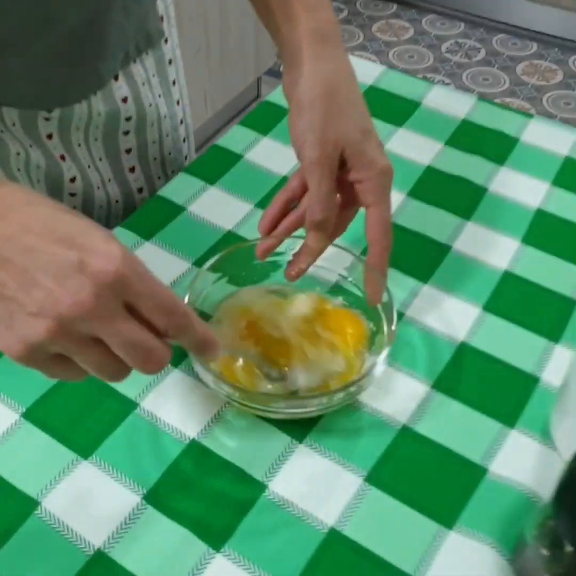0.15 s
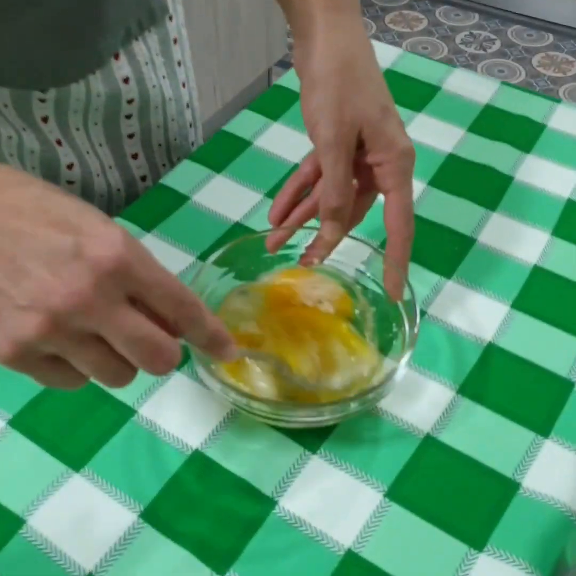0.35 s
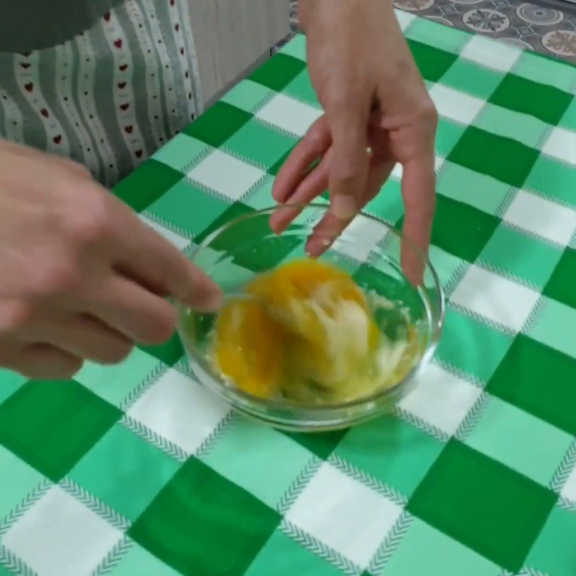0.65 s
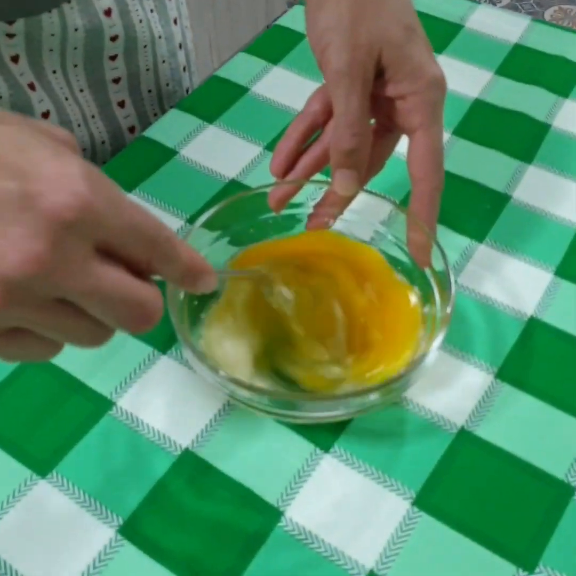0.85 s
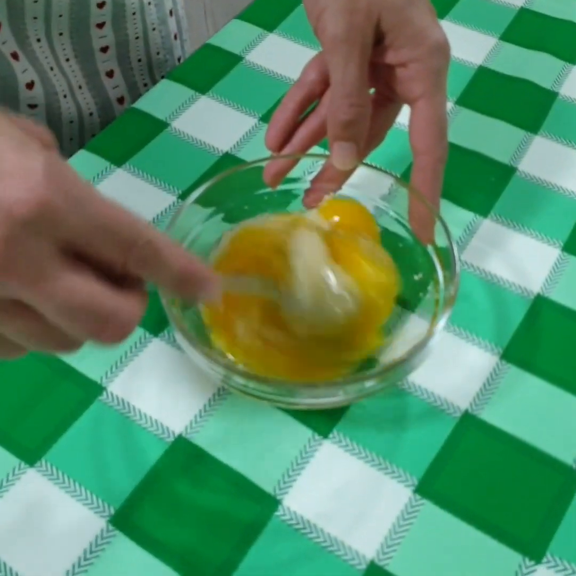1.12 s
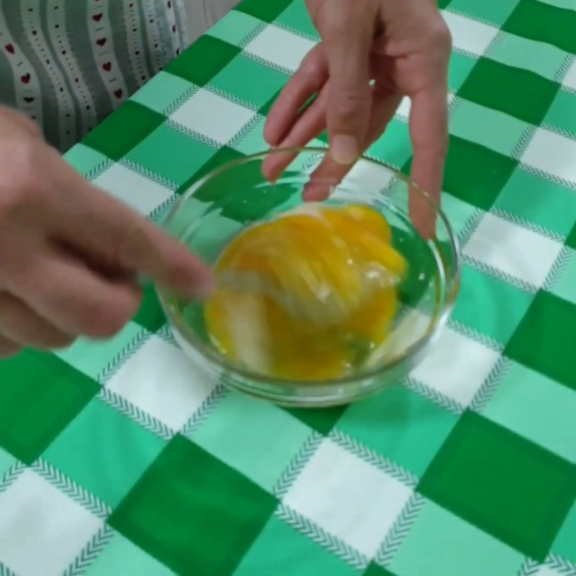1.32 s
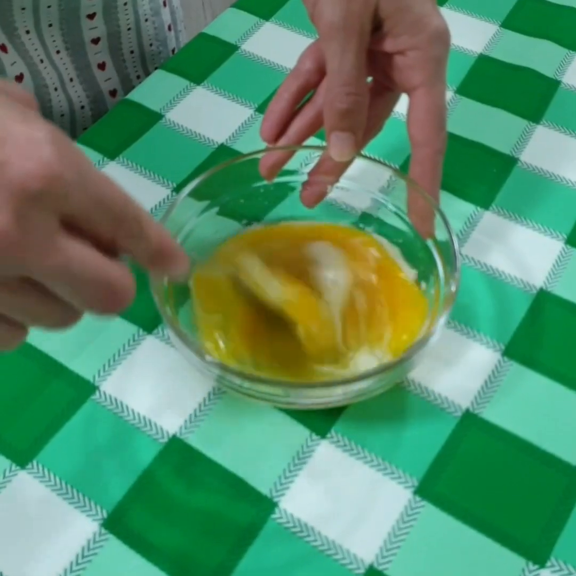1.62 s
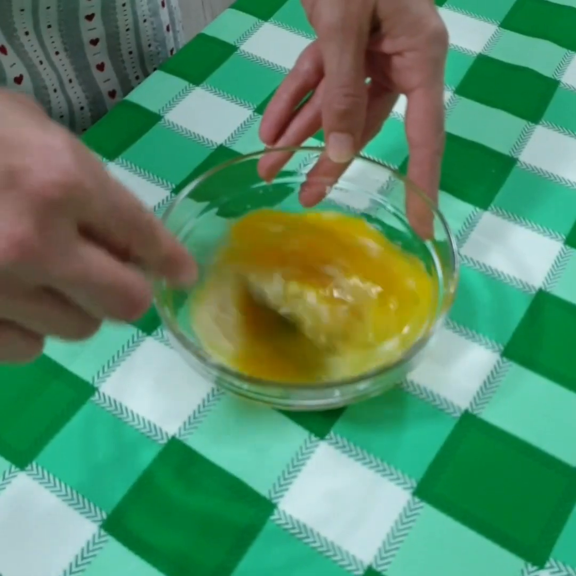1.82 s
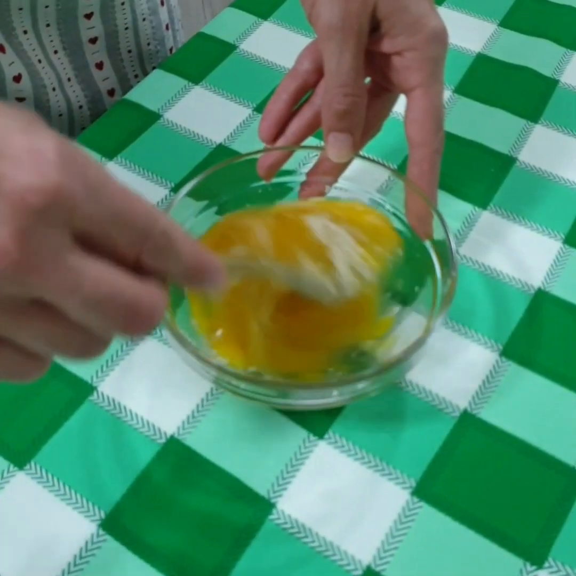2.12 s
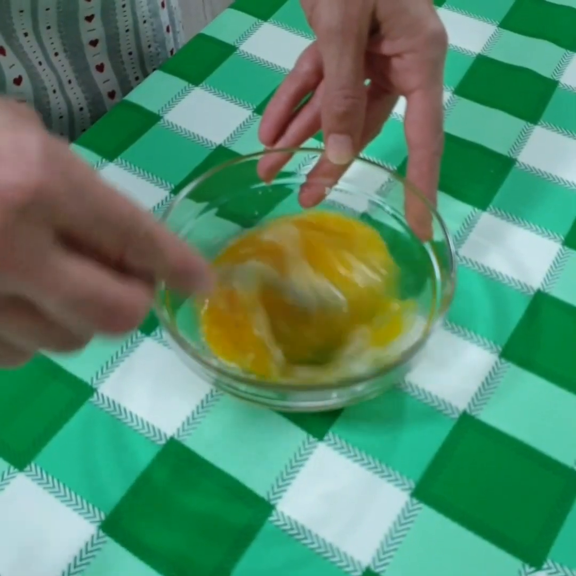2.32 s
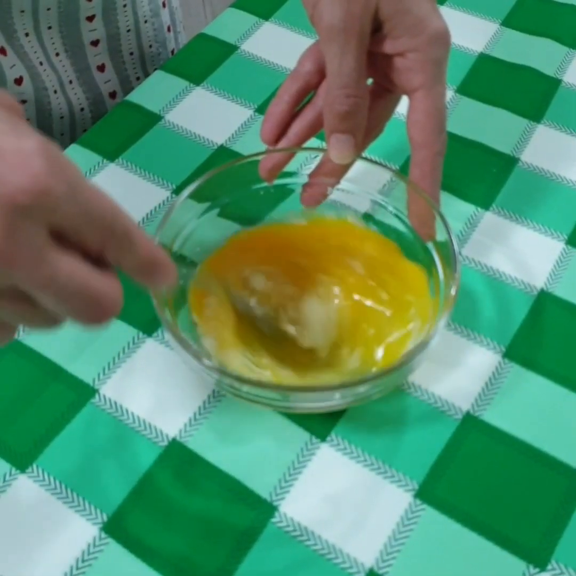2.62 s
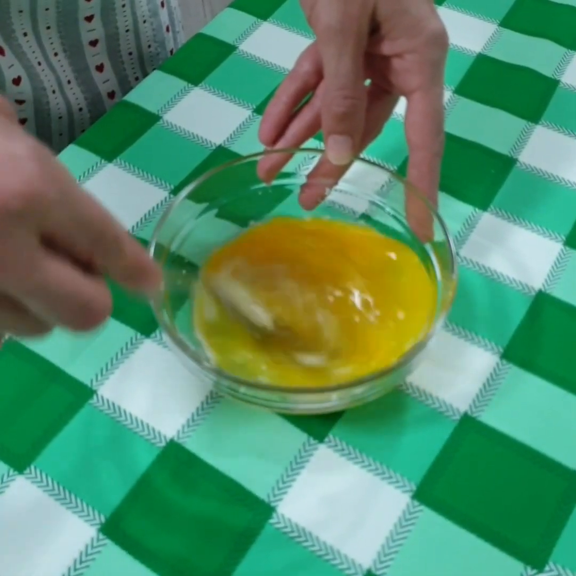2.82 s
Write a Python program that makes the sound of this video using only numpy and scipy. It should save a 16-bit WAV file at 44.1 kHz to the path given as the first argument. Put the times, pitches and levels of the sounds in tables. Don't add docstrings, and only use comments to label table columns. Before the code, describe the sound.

A fork beats eggs in a small glass bowl, about five strokes a second, with damped glassy ticks, wet swishes and soft table thumps; one loud rim clang comes early. Close stereo phone microphone, hard live kitchen.

```python
import sys
import numpy as np
from scipy import signal
from scipy.fft import rfft, irfft
from scipy.io import wavfile
from scipy.ndimage import uniform_filter1d

SR = 44100
rng = np.random.default_rng(int(sys.argv[2]) if len(sys.argv) > 2 else 0)


def amp(db):
    return 10 ** (np.asarray(db, float) / 20)


def write(x):
    x = np.atleast_2d(x).T
    wavfile.write(sys.argv[1], SR, np.round(np.clip(x, -1, 1) * 32767).astype(np.int16))


N = 130095

# [t/s, peak level/dB, strongest tone f/Hz, tone share/dB]
BOTTOM_TAPS = [(0.0324, -23.5, 2070, -10.5), (0.0573, -26.5, 2000, -10), (0.2263, -23, 10560, -4.5),
               (0.2563, -22, 2630, -4.5), (0.4223, -18, 13800, -13), (0.446, -24.5, 2034, -4),
               (0.626, -20.5, 2060, -11), (0.651, -28, 2020, -1.5), (0.818, -24, 7760, 1),
               (0.8334, -30, 2000, -15), (1.0171, -25.5, 7900, -4), (1.042, -31.5, 14800, 4),
               (1.4131, -19.5, 8700, -20), (1.444, -30.5, 14600, -5), (1.617, -22, 8600, -13),
               (1.6523, -26.5, 3080, -6.5), (2.0253, -26, 2710, 0), (2.0453, -38.5, 2490, 3),
               (2.226, -21.5, 4150, -6), (2.4296, -24.5, 2130, -12), (2.4563, -28.5, 7050, -1),
               (2.6411, -24.5, 14800, -3), (2.6628, -27.5, 2100, -7), (2.8639, -32, 2090, 3.5),
               (2.898, -44.5, 2360, 6)]
# [t/s, peak level/dB, strongest tone f/Hz, tone share/dB]
WALL_TAPS = [
    (0.1952, -35.5, 2200, 0.5),
    (0.399, -38.5, 13600, -18),
    (0.5953, -21.5, 2170, -8.5),
    (0.7879, -27.5, 7140, -3),
    (1.3847, -24, 3170, -9),
    (1.5842, -18, 6330, -7),
    (1.9918, -25.5, 6460, -4),
    (2.3854, -24.5, 7660, -2.5),
    (2.6044, -30, 2070, -10.5),
    (2.804, -20.5, 3100, -2.5),
]
# [t/s, peak level/dB, strongest tone f/Hz, tone share/dB]
WALL_KNOCKS = [(0.73, -34.5, 7600, -14), (1.2025, -26.5, 6500, -4), (1.7982, -10.5, 3180, -2),
               (1.8075, -24, 4000, -3), (1.8205, -26.5, 3580, -1), (2.8035, -33, 1414, 5.5),
               (2.2045, -36.5, 2430, -6), (2.7, -37, 3300, 2), (2.344, -45, 1600, 6),
               (2.4575, -40, 2560, 8.5), (1.7905, -38, 2900, 5), (1.4055, -36, 2400, 6),
               (1.0435, -36, 1750, 5), (1.6535, -37, 1900, 4)]
# [t/s, peak level/dB, f/Hz]
THUMPS = [(0.032, -32.5, 230), (0.058, -29, 228), (0.228, -26, 240), (0.256, -30, 271), (0.422, -24.5, 265),
          (0.447, -27.5, 217), (0.625, -26, 274), (0.651, -27, 246), (0.819, -30, 245), (0.834, -31.5, 201),
          (1.018, -27.5, 244), (1.042, -28.5, 218), (1.211, -25.5, 277), (1.242, -26, 196),
          (1.414, -24.5, 262), (1.445, -30.5, 219), (1.617, -25, 235), (1.65, -26, 210), (1.797, -41, 254),
          (1.822, -23, 234), (1.854, -33, 217), (2.026, -27, 250), (2.227, -24, 259), (2.431, -27, 228),
          (2.458, -31.5, 250), (2.645, -30.5, 217), (2.663, -28.5, 251), (2.802, -34.5, 198),
          (2.862, -30, 254.6)]
# [t/s, peak level/dB, f/Hz]
POPS = [(0.424, -49, 546), (0.595, -30.5, 1210), (0.798, -40.5, 800), (0.984, -40.5, 967),
        (1.018, -37.5, 665), (1.446, -41, 1517), (1.681, -35.5, 623), (1.798, -34, 787),
        (2.198, -50.5, 1490), (2.345, -41.5, 970), (2.385, -40.5, 986), (2.576, -43.5, 1290),
        (2.608, -44.5, 880), (2.804, -38.5, 950), (0.7875, -42, 1200), (0.978, -47, 1250),
        (1.403, -40, 900), (1.411, -42, 800), (1.615, -42, 900), (2.612, -44, 1400)]
# [t/s, peak level/dB]
CLANGS = [
    (1.2105, -23),
    (1.2158, -2),
    (1.2195, -19),
]

RIM_HZ = [830, 945, 1165, 1400, 2448, 4300, 4364, 6390, 6480, 6590, 8800, 8907, 11570, 14495]
# [level/dB, t60/s]
RIM_DECAY = [(-22, .04), (-19, 0.039), (-18, 0.044), (-20, .03), (-19, 0.072), (-3, .02), (-7, .05),
             (-5, .02), (-5, 0.044), (-6, 0.042), (-4, .02), (-2, 0.055), (-10, .04), (-15, .09)]
# [f/Hz, level/dB, t60/s]
MORE_RIM_MODES = [(1763, -24, 0.073), (1960, -21.5, 0.087), (2044, -24, .08), (3167, -15, 0.045),
                  (4810, -9.5, 0.06), (5340, -15, .04), (6000, -18, .07), (6290, -16, 0.08), (7500, -25, .06),
                  (10100, -15, .03), (12170, -13, .05), (13300, -16, 0.035), (15100, -15, .06),
                  (15400, -18, .05)]
# [f/Hz, level/dB, t60/s]
BOWL_MODES = [(2070, -2.5, 0.033), (2620, -3, 0.029), (3148, -3, 0.025), (4150, -0.5, 0.02),
              (7360, 6.5, 0.027), (7840, 4.5, 0.022), (8380, -3, .02)]
# [f/Hz, level/dB, t60/s]
TABLE_MODES = [(61.2, -15.5, 0.5), (99, -6, 0.4), (136.14, -1, 0.46), (184.9, -2, 0.37),
               (223.5, -0.5, 0.29), (250, -3.5, 0.43), (285, -1.5, 0.44), (339, -11, 0.21),
               (368, -16.5, .25), (415, -21, 0.23), (466, -21, 0.24), (500.6, -22, 0.21), (593, -24, .15)]

# [f/Hz, level/dB]
SCRAPE_COLOUR = [(300, -24), (800, -21), (1300, -10), (2100, 0.5), (4000, -5), (7800, 5.5), (11000, -3),
                 (16000, 1)]
# [f/Hz, level/dB]
WALL_COLOUR = [(300, -42), (900, -12.5), (2000, -6), (3200, -1), (4500, 0.5), (6500, 1.5), (10000, -2),
               (16000, -4)]
# [f/Hz, level/dB]
KNOCK_COLOUR = [(300, -28), (900, -18), (2200, -15), (3200, 0), (4500, -0.5), (7000, 4.5), (10000, -1.5),
                (16000, -9)]
# [f/Hz, level/dB]
BOTTOM_WASH = [(350, -8), (500, -9), (946, -2.5), (1200, -12), (1600, -1), (2300, -3), (5160, -11.5),
               (7600, -6.5)]
# [f/Hz, level/dB]
WALL_WASH = [(300, -22), (500, -8.5), (774, -2.5), (1100, -9), (1970, -4.5), (3350, 0), (9090, -6),
             (16000, -10)]
# [f/Hz, level/dB]
RATTLE_COLOUR = [(400, -14), (1200, -6), (2000, -3), (3000, -6), (5000, 0), (7500, -4), (11000, -4),
                 (15000, -2)]
# [f/Hz, level/dB per Hz]
HUM_COLOUR = [(15, -52), (25, -33), (60, -8), (256, -4.5), (400, -23.5), (1000, -36.5), (2100, -34.5),
              (16000, -29.5)]
# [f/Hz, t60/s]
ROOM_T60 = [(250, 0.5), (1000, 0.96), (4000, 0.49), (15000, 0.09)]
# [f/Hz, level/dB]
ROOM_COLOUR = [(250, -2.6), (1000, 3.7), (4000, -3), (15000, -2.5)]

BASS_SIDE_DB = -22.5
SWELL_S, FADE_S, TICK_LATE_S = 0.0016, 0.0012, 0.0014
TONE_RISE_S, TONE_T60_S, BOWL_DB, SCATTER_DB = 0.0008, 0.0099, -23, 5
SCRAPE_DB, SPREAD_DB = -5, -3
BOUNCE_GAP_S, BOUNCE_SWELL_S, BOUNCE_DB, BOUNCE_BOWL_DB = 0.045, 0.00032, 2.5, 8
THUMP_RISE_S, THUMP_HOLD_S, THUMP_FADE_S = 0.0011, 0.01095, 0.0026
OVERTONE_DB, TABLE_DB, TREMBLE_DB = -21, -11.5, -81
POP_T60_S, POP_RISE_S, POP_GLIDE = 0.025, 0.001, 0.13
SLOSH_DB, SLOSH_HZ, SLOSH_FADE_S = -28, 1310, 0.031
WASH_T60_S, WASH_TOP_T60_S, WASH_SPLIT_HZ, WASH_RISE_S = 0.47, 0.33, 7500, 0.0017
WASH_ALIKE = 0.3
FLICKER_DB, FLICKER_S = 2, 0.0035
CRACK_DB, CLANG_RISE_S, BURST_DB, BURST_S = -10, 0.0013, 5, 0.004


def colour(x, points):
    hz, db = np.array(points).T
    f = np.maximum(np.fft.rfftfreq(x.shape[-1], 1 / SR), 1)
    return irfft(rfft(x) * amp(np.interp(np.log(f), np.log(hz), db)), x.shape[-1])


def unit(x):
    return x / np.sqrt(np.mean(x ** 2))


def add(out, s, x):
    i = max(int(s * SR), 0)
    out[i:i + len(x)] += x[:N - i]


def rise(t, rise_s):
    return 1 - np.exp(-t / rise_s)


def decay(t, t60_s):
    return np.exp(-np.log(1000) * t / t60_s)


def wander(window_s):
    size = int(window_s * SR)
    return unit(uniform_filter1d(uniform_filter1d(rng.standard_normal(N), size), size))


def ring(modes, length_s, db=0, turn=0):
    t = np.arange(int(length_s * SR))[:, None] / SR
    hz, level, t60 = np.array(modes).T
    return (amp(level + db) * decay(t, t60) * np.sin(2 * np.pi * (hz * t + turn))).sum(axis=1)


def hum():
    mid, side = colour(rng.standard_normal((2, N)), HUM_COLOUR)
    side = colour(side, [(100, BASS_SIDE_DB), (905, 0)])
    level = amp(-48 + 2.5 * wander(0.068))
    return level * np.array([mid + side, mid - side]) / np.std(mid)


def wash(rows, points, wash_db):
    power, t, out = np.zeros(N), np.arange(SR) / SR, 0
    for s, db, *_ in rows:
        add(power, s, amp(np.array([2 * (db + wash_db)])))
    shared, left, right = unit(colour(rng.standard_normal((3, N)), points))
    noise = np.sqrt(WASH_ALIKE) * shared + np.sqrt(1 - WASH_ALIKE) * np.array([left, right])
    low = signal.sosfilt(signal.butter(1, WASH_SPLIT_HZ, fs=SR, output="sos"), noise)
    for part, t60_s in ((low, WASH_T60_S), (noise - low, WASH_TOP_T60_S)):
        fall = (decay(t, t60_s) * rise(t, WASH_RISE_S)) ** 2
        level = np.sqrt(np.abs(signal.fftconvolve(power, fall)[:N]))
        out = out + part * amp(FLICKER_DB * wander(FLICKER_S)) * level
    return out


def thumps():
    out, push, t = np.zeros(N), np.zeros(N), np.arange(2048) / SR
    shape = rise(t, THUMP_RISE_S) * np.exp(-np.maximum(t - THUMP_HOLD_S, 0) / THUMP_FADE_S)
    for s, db, hz in THUMPS:
        phase = 2 * np.pi * hz * t
        add(out, s, amp(db) * shape * (np.sin(phase) + amp(OVERTONE_DB) * np.sin(2 * phase)))
        add(push, s + 0.00392, amp(np.array([db])))
    body = ring(TABLE_MODES, 0.8, TABLE_DB)
    body = body * rise(np.arange(len(body)) / SR, 0.0034)
    tremble = amp(TREMBLE_DB) * rng.standard_normal(N)
    return out + signal.fftconvolve(push + tremble, body)[:N], push


def taps(rows, points):
    out, wide = np.zeros(N), np.zeros(N)
    hiss, other = unit(colour(rng.standard_normal((2, N)), points))
    lead_s = 512 / SR
    t = np.arange(4096) / SR - lead_s
    soft = rise(np.arange(int(0.05 * SR)) / SR, TONE_RISE_S)
    chance = rng.standard_normal((len(rows), len(BOWL_MODES)))
    bounces = np.diff([row[0] for row in rows], prepend=-1) % 9 < BOUNCE_GAP_S
    for (s, db, hz, tone_db), c, bounce in zip(rows, chance, bounces):
        db = db + bounce * BOUNCE_DB
        swell_s = BOUNCE_SWELL_S if bounce else SWELL_S
        shape = np.where(t < 0, np.exp(np.minimum(t, 0) / swell_s), np.exp(-t / FADE_S))
        shape = amp(SCRAPE_DB) * shape
        i = int(s * SR) % (N - len(t))
        start_s = s + TICK_LATE_S - lead_s
        add(out, start_s, amp(db) * shape * hiss[i:i + len(t)])
        add(wide, start_s, amp(db + SPREAD_DB) * shape * other[i:i + len(t)])
        tone = ring([(hz, tone_db + 4.0, TONE_T60_S)], 0.05) * soft
        add(out, s + TICK_LATE_S / 2, amp(db) * tone)
        bowl_db = BOWL_DB + bounce * BOUNCE_BOWL_DB + SCATTER_DB * c
        add(out, s, amp(db) * ring(BOWL_MODES, 0.08, bowl_db, c))
    return np.array([out, wide])


def kitchen(x):
    t, tail = np.arange(int(0.7 * SR)) / SR, 0
    hz, t60 = np.array(ROOM_T60).T
    octave = np.log2(np.maximum(np.fft.rfftfreq(len(t), 1 / SR), 1))
    for k, t60_s in enumerate(t60):
        share = np.sqrt(np.interp(octave, np.log2(hz), np.arange(len(hz)) == k))
        band = irfft(rfft(rng.standard_normal((2, len(t)))) * share, len(t))
        tail = tail + band * decay(t, t60_s) / np.sqrt(t60_s * SR / np.log(1000) / 2)
    early = amp(8 * np.exp(-t / 0.011))
    tail = colour(tail, ROOM_COLOUR) * rise(t, 0.00067) * early
    return signal.fftconvolve(x[None], tail, axes=1)[:, :N]


def egg(push):
    out, t = np.zeros(N), np.arange(4096) / SR
    for s, db, hz in POPS:
        phase = 2 * np.pi * hz * (t + POP_GLIDE * (t / 0.021 - 1) * t / 2)
        add(out, s, amp(db) * decay(t, POP_T60_S) * rise(t, POP_RISE_S) * np.sin(phase))
    fade = np.exp(-np.arange(SR // 2) / SR / SLOSH_FADE_S)
    drag = signal.fftconvolve(push, fade)[:N]
    grains = rng.standard_normal(N) * amp(3.7 * np.minimum(rng.exponential(size=N), 6.5))
    wet = unit(colour(grains, [(300, -20), (600, 0), (SLOSH_HZ, -8), (2500, -3), (9000, -4)]))
    return out + amp(SLOSH_DB) * drag * wet


def clangs():
    out, t = np.zeros(N), np.arange(SR // 2) / SR
    crack = unit(colour(rng.standard_normal(len(t)), SCRAPE_COLOUR))
    crack = crack * np.exp(-t / 0.0019) * amp(CRACK_DB)
    modes = np.vstack([np.column_stack([RIM_HZ, RIM_DECAY]), MORE_RIM_MODES])
    swell = rise(t, CLANG_RISE_S) * amp(BURST_DB * np.exp(-(t / BURST_S) ** 2))
    for (s, db), turn in zip(CLANGS, rng.random((len(CLANGS), len(modes)))):
        add(out, s, amp(db) * (ring(modes, 0.5, -8.5, turn / 8) * swell + crack))
    return out


def scene():
    low, push = thumps()
    low = amp(-2) * low
    ticks, wide = (taps(BOTTOM_TAPS, SCRAPE_COLOUR) + taps(WALL_TAPS, WALL_COLOUR)
                   + taps(WALL_KNOCKS, KNOCK_COLOUR))
    rim, wet = clangs(), egg(push)
    bright = ticks + rim + wet

    port_lag_s, lag_share = 0.00008, 0.63
    f = np.fft.rfftfreq(N, 1 / SR)
    late = irfft(rfft(bright) * np.exp(-2j * np.pi * f * port_lag_s), N) * lag_share
    late = late + bright * np.sqrt(1 - lag_share ** 2) / 2
    during_clang = np.abs(np.arange(N) / SR - CLANGS[1][0] - 0.04) < 0.045
    side = amp(BASS_SIDE_DB) * np.roll(low, 60) + wide
    left = bright + (amp(2.5) - 1) * wet + low + side
    right = late * amp(0.5 + 2.5 * during_clang) + low - side

    trail = wash(BOTTOM_TAPS, BOTTOM_WASH, -23)
    trail = trail + wash([(0, -29)] + WALL_TAPS, WALL_WASH, -24.5)
    trail = trail + wash(WALL_KNOCKS, WALL_WASH, -18.5) + wash(CLANGS, RATTLE_COLOUR, -34)
    to_room = amp(-6) * ticks + amp(-3.5) * rim + amp(-4.5) * wet + amp(-12.0) * low
    return np.array([left, right]) + trail + kitchen(to_room) + amp(-6) * hum()


def band_limit(x):
    return signal.sosfilt(signal.butter(12, 16990, fs=SR, output="sos"), x)


def record(dry):
    top_cut = signal.ellip(8, 0.2, 70, 16000, fs=SR, output="sos")
    return band_limit(signal.sosfilt(top_cut, dry))


dry = scene()
out = record(dry)
write(out)
```